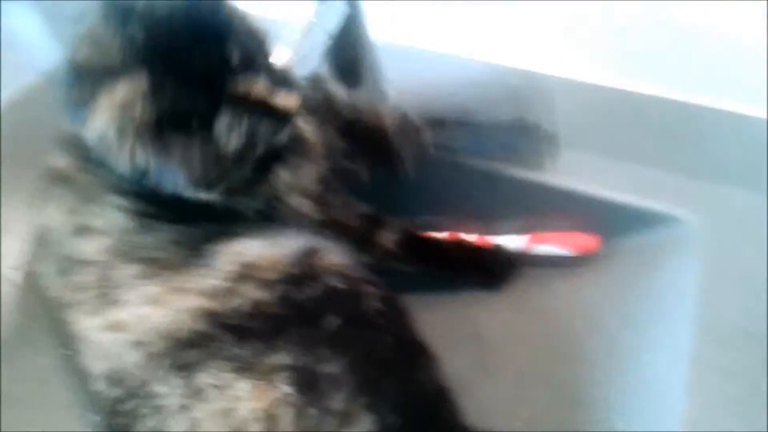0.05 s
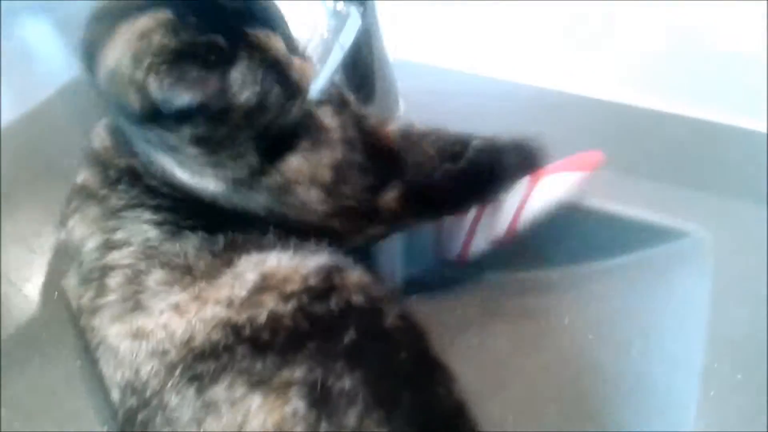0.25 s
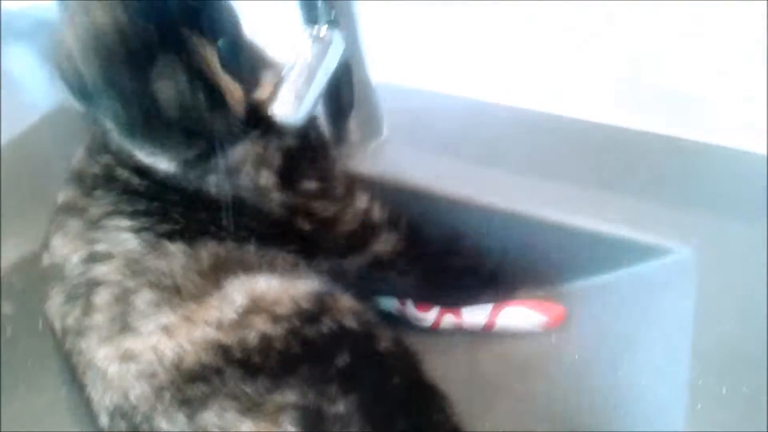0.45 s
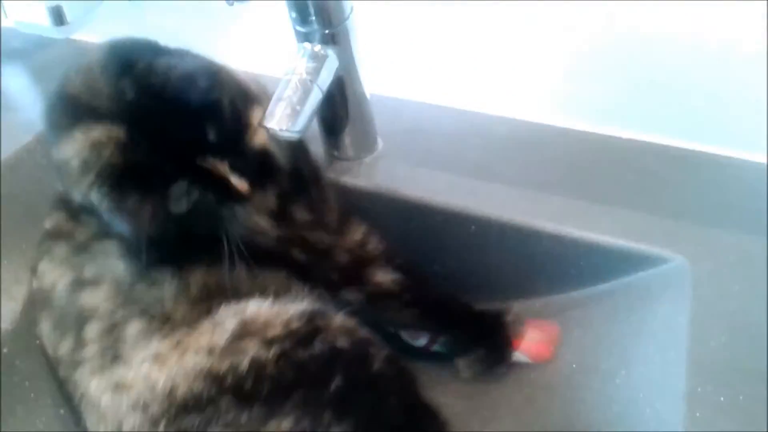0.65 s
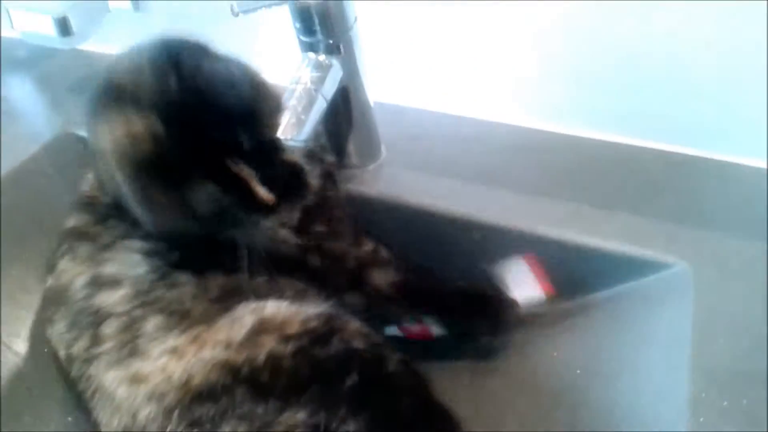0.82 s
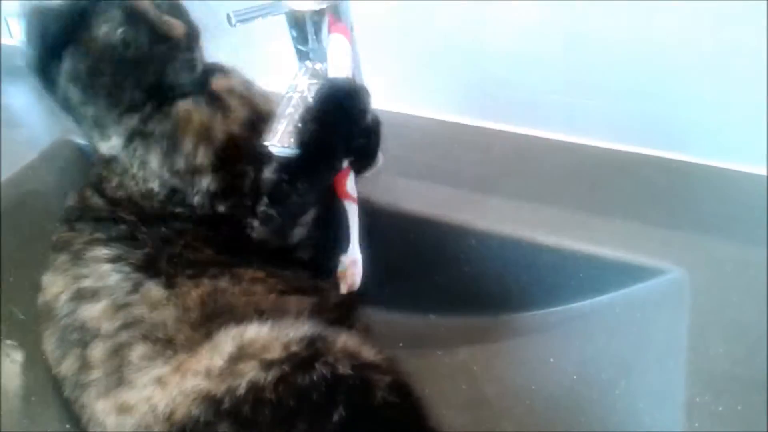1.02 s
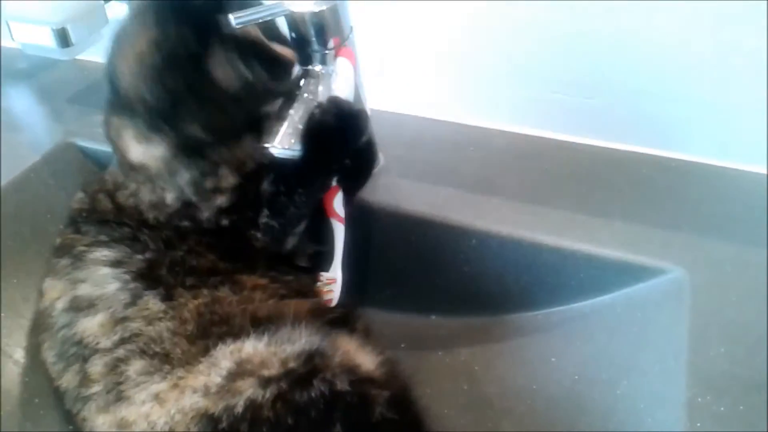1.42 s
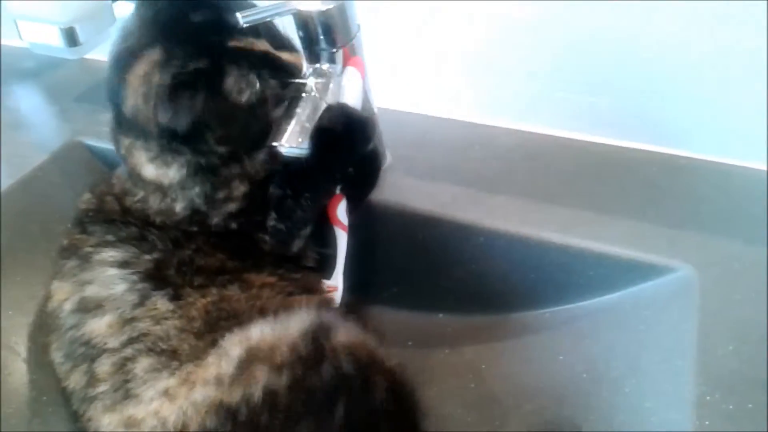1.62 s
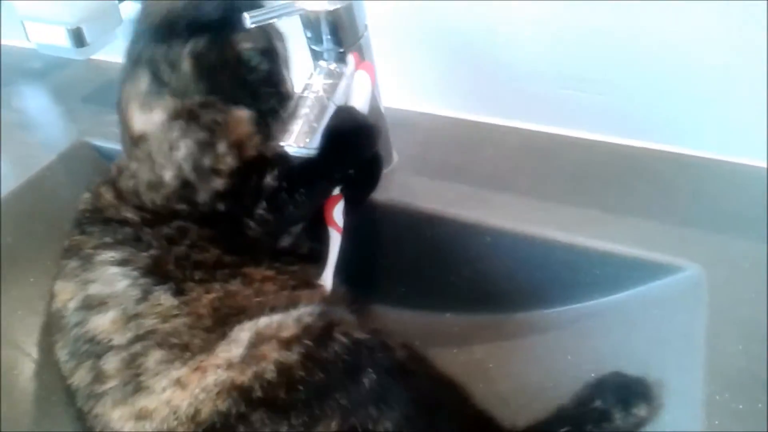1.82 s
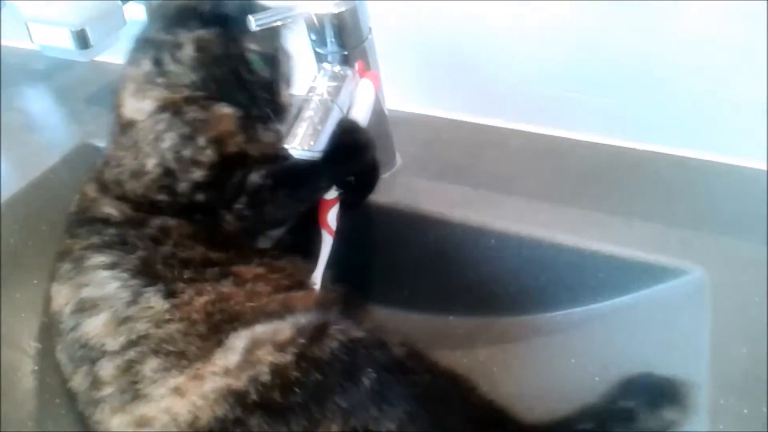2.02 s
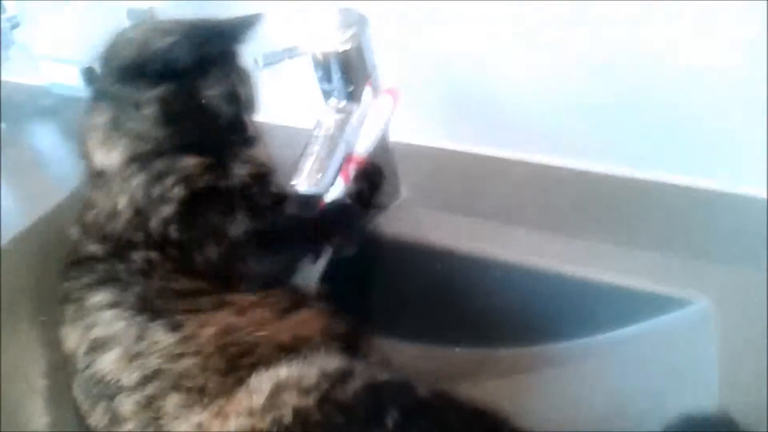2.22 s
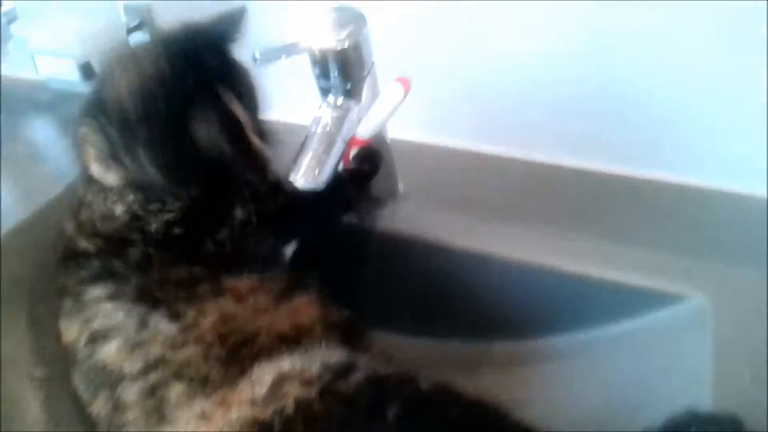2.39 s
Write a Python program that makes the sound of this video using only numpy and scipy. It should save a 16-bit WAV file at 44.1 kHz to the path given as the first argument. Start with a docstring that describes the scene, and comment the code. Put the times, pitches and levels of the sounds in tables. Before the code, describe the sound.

Plastic knocks and soft thumps as a cat paws a toothbrush in a bathroom sink.

```python
"""Plastic knocks and clicks ring in a small hard bathroom: a cat lying in the sink paws at a toothbrush.
Each knock sets the basin and the brush ringing, and the cat's body thumps the low modes of the counter.
Paws pat softly and fur rubs on the basin, all close to a small mono microphone.
A faint hiss swells behind each sound and sinks back in the quiet."""
import sys
import numpy as np
from scipy import signal
from scipy.fft import rfft, irfft
from scipy.io import wavfile
from scipy.ndimage import uniform_filter1d

SR = 44100
rng = np.random.default_rng(int(sys.argv[2]) if len(sys.argv) > 2 else 0)


def unload_wav(signal):
    """Save mono or channel-first audio to the path in sys.argv[1] as 16-bit WAV at rate SR, clipped to [-1, 1]."""
    wavfile.write(
        sys.argv[1],
        SR,
        np.round(np.clip(np.atleast_2d(signal).T, -1, 1) * 32767).astype(np.int16),
    )


N = 112454
T = np.arange(int(.9 * SR)) / SR  # time axis of one event, s
HZ = np.fft.rfftfreq(8192, 1 / SR)  # frequency axis of the filters


def amp(db):
    """Decibels to gain."""
    return 10 ** (np.asarray(db) / 20)


def curve_at(points, hz):
    """Interpolates a curve on a log-frequency axis."""
    freq_hz, value = np.transpose(points)
    return np.interp(np.log(hz + 1), np.log(freq_hz + 1), value)


def add(mix, start_s, sound):
    """Places a sound in the mix."""
    part = mix[round(start_s * SR):][:len(sound)]
    part += sound[:len(part)]


def fade(t, t60_s):
    """Exponential decay, down 60 dB at t60_s."""
    return np.exp(-np.log(1000) * t / t60_s)


def colour(eq):
    """An EQ curve as gains of mean power 1."""
    gain = amp(curve_at(eq, HZ))
    return gain / np.sqrt(np.mean(gain ** 2))


def filtered(x, gain):
    """Minimum-phase EQ: nothing sounds ahead of an attack."""
    log_gain = np.log(np.maximum(np.r_[gain, gain[-2:0:-1]], 1e-5))
    taps = np.fft.ifft(np.exp(np.conj(signal.hilbert(log_gain)))).real
    return signal.fftconvolve(x, taps[:len(taps) // 2])[:len(x)]


def ring(modes, weight):
    """Dying sines, each as strong as the blow is at its pitch."""
    return sum(amp(db) * weight(hz) * fade(T, t60_s) * np.sin(2 * np.pi * hz * T)
               for hz, db, t60_s in modes)


def burst(t60_s):
    """A short dying scatter of tiny contacts, with its spectrum evened out."""
    noise = rng.standard_normal(len(T)) * fade(T, t60_s)
    even = irfft(np.exp(1j * np.angle(rfft(noise))), len(T))
    return even * (T < t60_s) * np.linalg.norm(noise)


def in_room(direct_db, room_db, rise_s=0.0029):
    """One sharp impulse and its dense reflections, each band dying at its own speed."""
    # bathroom reverb time: freq_hz, t60_s
    decay = [(60, 0.6), (150, 0.41), (400, 0.46), (1000, 0.5), (2500, 0.39), (5000, 0.48), (14000, 0.54)]
    hz, t, bands = signal.stft(rng.standard_normal(len(T)), SR, nperseg=256)
    tail = signal.istft(bands * fade(t, curve_at(decay, hz)[:, None]), SR)[1][:len(T)]
    return amp(direct_db) * (T == 0) + amp(room_db) * tail * (1 - np.exp(-T / rise_s))


def background(sound, floor_db=-69.5, threshold_db=-77.5, lift_slope=0.32, lag_s=0.042, hiss_hz=710):
    """Room rumble and microphone hiss; the hiss follows the level of the sound with a lag."""
    # noise floor spectrum: freq_hz, gain_db
    floor_eq = [(12, -25), (20, 6), (37, -21.5), (82, -2.5), (115, -10.5), (347, -13), (377, -17),
                (540, -16), (818, -18), (889, -17), (2340, -21.5), (15000, -25)]
    noise = amp(floor_db) * filtered(rng.standard_normal(N + SR), colour(floor_eq))[SR:]
    power = abs(uniform_filter1d(sound ** 2, size=600))
    over_db = 10 * np.log10(1 + power / amp(threshold_db) ** 2)
    pole = np.exp(-1 / (lag_s * SR))
    lift = amp(lift_slope * signal.lfilter([1 - pole], [1, -pole], over_db))
    hiss = signal.lfilter(*signal.butter(1, hiss_hz, "high", fs=SR), noise)
    return noise + (lift - 1) * hiss


def fur_rub(middle_s, length_s, level_db, lowpass_hz):
    """Fur and paws slide on the basin: a soft swell of dull friction noise."""
    # friction spectrum: freq_hz, gain_db
    rub_eq = [(50, -18), (110, -2.5), (250, -1.5), (500, -5.5), (1500, -4.5), (6000, -22)]
    stroke = np.sin(np.pi * np.minimum(T / length_s, 1)) * rng.standard_normal(len(T))
    gain = amp(curve_at(rub_eq, HZ)) / np.hypot(1, (HZ / lowpass_hz) ** 2)
    gain /= np.sqrt(np.mean(gain ** 2))
    return middle_s - length_s / 2, amp(level_db) * filtered(stroke, gain)


def pat(start_s, level_db, pitch_hz, t60_s):
    """A light touch: one heavily damped tone, too near and weak to wake the room."""
    attack = 1 - np.exp(-2 * np.pi * pitch_hz * T)
    return start_s, amp(level_db) * attack * fade(T, t60_s) * np.sin(2 * np.pi * pitch_hz * T)


def body_thump(start_s, level_db, lowpass_hz, ring_db):
    """The cat's soft heavy blow wakes the low modes of the counter."""
    # spectrum of the blow: freq_hz, gain_db
    thump_eq = [(25, -36), (60, -5.5), (95, 5), (180, -1.5), (330, -4), (520, -8), (900, -4), (2000, -15),
                (6000, -13.5)]
    # counter resonances: pitch_hz, level_db, t60_s
    counter_modes = [(92.7, -5.5, .3), (103.8, -4.5, 0.22), (134.5, 0, 0.36), (236.6, -8.5, 0.54),
                     (260.4, -7.5, 0.43), (316, -4.5, 0.23), (330.4, -12, 0.41), (356, -8.5, 0.45),
                     (405, -16, 0.3), (661, -16, 0.39), (751, -16, 0.59)]
    weight = lambda hz: 1 / np.hypot(1, (hz / lowpass_hz) ** 2)
    blow = filtered(in_room(direct_db=20, room_db=4.5), colour(thump_eq) * weight(HZ))
    return start_s, amp(level_db) * (blow + amp(ring_db) * ring(counter_modes, weight))


def plastic_click(start_s, level_db, pitch_hz, t60_s, snap_db, lowpass_hz):
    """A short dry ping of plastic with a bright snap above its pitch."""
    # snap spectrum: freq_hz, gain_db
    snap_eq = [(200, -12), (1700, -3), (2500, 3), (3400, 0), (4500, -13.5), (5600, -8.5), (8000, -20),
               (11500, -7.5), (15000, -17.5)]
    highpass = 1 / np.hypot(1, (1.09 * pitch_hz / (HZ + 1)) ** 8)
    band = highpass / np.hypot(1, HZ / lowpass_hz)
    snap = filtered(burst(t60_s=0.0063), colour(snap_eq) * band)
    _, ping = pat(start_s, level_db, pitch_hz, t60_s)
    return start_s, ping + amp(level_db + snap_db) * snap


def brush_knock(start_s, level_db, bass_db, treble_db, basin_db, brush_db, bass_hz=450, treble_hz=1800):
    """Hard plastic hits the basin and chatters briefly; basin, brush and room all ring."""
    # spectrum of the contact: freq_hz, gain_db
    knock_eq = [(40, -30), (90, -3), (190, 8.5), (400, -0.5), (700, -4), (1250, -1), (1650, -4.5),
                (2500, -3.5), (3400, -11.5), (4800, -21.5), (8000, -33), (15000, -40)]
    # basin resonances: pitch_hz, level_db, t60_s
    basin_modes = [(136.2, -11, 0.44), (184.6, -13.5, 0.27), (234.9, -13, 0.36), (289, -17, .35),
                   (417, -11.5, 0.35), (444, -15.5, 0.36), (573.7, -21, 0.45), (821, -16, 0.35),
                   (840, -11, 0.44), (960, -25, 0.33), (1104, -15, .36), (1251, -10, 0.27),
                   (1374, -14, 0.16), (1536, -14.5, 0.27), (1810, -22.5, 0.44), (2307, -20.5, .4),
                   (2932, -18, 0.22)]
    # toothbrush resonances: pitch_hz, level_db, t60_s
    brush_modes = [(677, -9, 0.58), (698, -13, 0.48), (1151, -5.5, 0.43), (1345, -18.5, .5),
                   (1473, -12, .5), (2013, -8.5, 0.31), (2546, -19, 0.61), (2578, -10.5, 0.48),
                   (2737, -17.5, 0.25), (3740, -18, 0.29), (4200, -28, 0.3)]

    def shelves(hz):
        """Bass and treble shelves give each hit its own tone."""
        return amp(bass_db / (1 + (hz / bass_hz) ** 4) + treble_db / (1 + (treble_hz / (hz + 1)) ** 4))

    impact = in_room(direct_db=12, room_db=-1)
    chatter = amp(6) * burst(t60_s=0.028)
    blow = filtered(impact + chatter, colour(knock_eq) * shelves(HZ))
    basin = amp(basin_db) * ring(basin_modes, shelves)
    brush = amp(brush_db) * ring(brush_modes, shelves)
    return start_s, amp(level_db) * (blow + basin + brush)


def scene(low_cut_hz=98):
    """All hits and rubs, thinned in the deep bass, over the background; alike in both channels."""
    # toothbrush on the basin: start_s, level_db, bass_db, treble_db, basin_db, brush_db
    knocks = [(0.1361, -64.5, -12, 6.5, -16, 3), (0.1593, -57, -5, 10, -1.5, -4),
              (0.2278, -43.5, -5.5, 1.5, -11, -1.5), (0.353, -51, 5, 11, -7, -11),
              (0.4089, -40, 5, -2, -2, -6), (0.4127, -40.5, 3.5, 3, 8, -19.5),
              (0.7041, -62.5, 3.5, 7, -24, -4), (1.0489, -59.5, 0, 2, -4, -10)]
    # cat's body on the counter: start_s, level_db, lowpass_hz, ring_db
    thumps = [(0.106, -61, 195, -3.5), (0.178, -57.5, 297, -8), (0.792, -51.5, 485, -3.5),
              (1.0485, -38.5, 553, -2), (1.090, -45, 396, 4.5), (1.114, -43, 146, -0.5)]
    # dry plastic clicks: start_s, level_db, pitch_hz, t60_s, snap_db, lowpass_hz
    clicks = [(0.3541, -31, 1260, 0.019, -1.5, 6500), (0.6407, -40.5, 3400, 0.0084, 2.5, 12000),
              (1.0478, -54.5, 2780, 0.033, -1, 5000), (1.0486, -59.5, 3680, 0.065, -10, 5000),
              (1.3440, -57.5, 1140, 0.018, -3, 4000)]
    # soft paw pats: start_s, level_db, pitch_hz, t60_s
    pats = [(0.3575, -35.5, 161, 0.037), (0.5590, -24, 433, 0.0027), (0.9265, -40.5, 330, 0.0062),
            (1.1216, -31, 106.5, 0.07), (1.145, -36, 127, 0.067), (2.1935, -43, 185, 0.011)]
    # fur and paws on the basin: middle_s, length_s, level_db, lowpass_hz
    rubs = [(0.865, .04, -62, 596), (1.39, .11, -72, 604), (1.465, .04, -73, 330), (2.181, 0.086, -74, 400),
            (2.34, .1, -69.5, 300), (2.516, 0.097, -74.5, 910)]
    mix = np.zeros(N)
    for source, cues in ((brush_knock, knocks), (body_thump, thumps), (plastic_click, clicks),
                         (pat, pats), (fur_rub, rubs)):
        for cue in cues:
            add(mix, *source(*cue))
    mix = signal.lfilter(*signal.butter(2, low_cut_hz, "high", fs=SR), mix)
    return np.tile(mix + background(mix), (2, 1))


def record(dry, high_cut_hz=15150):
    """A steep high cut takes off the topmost air."""
    taps = signal.firwin(511, high_cut_hz, window=("kaiser", 8), fs=SR)
    return signal.oaconvolve(dry, taps[None], "same", axes=1)


dry = scene()
out = record(dry)
unload_wav(out)
```